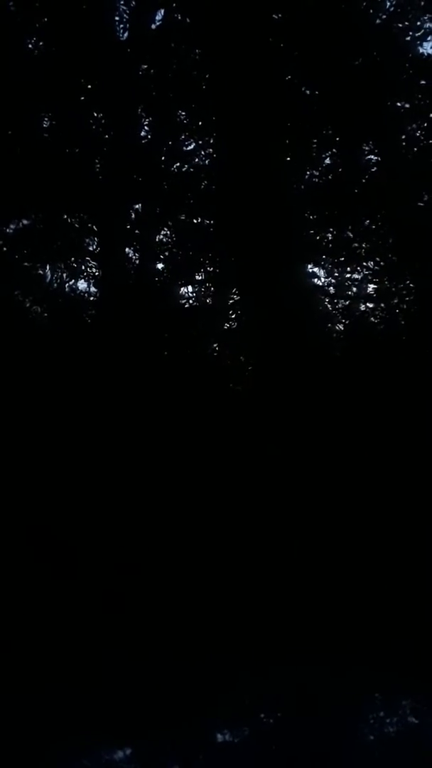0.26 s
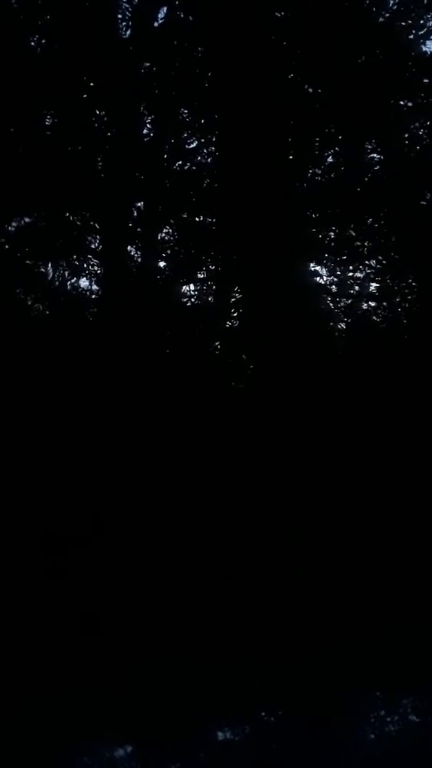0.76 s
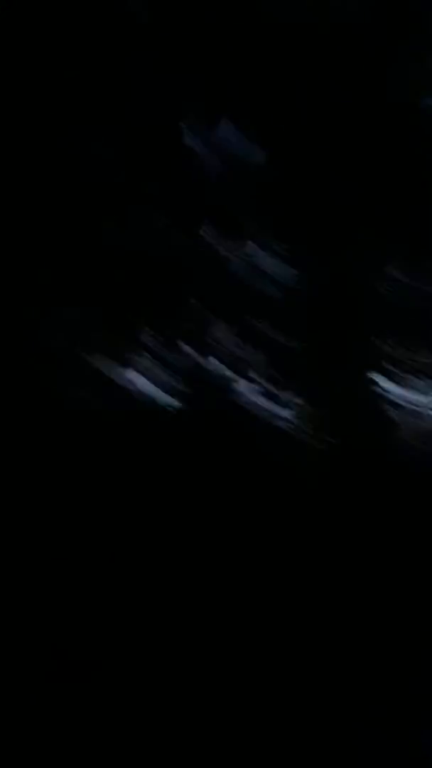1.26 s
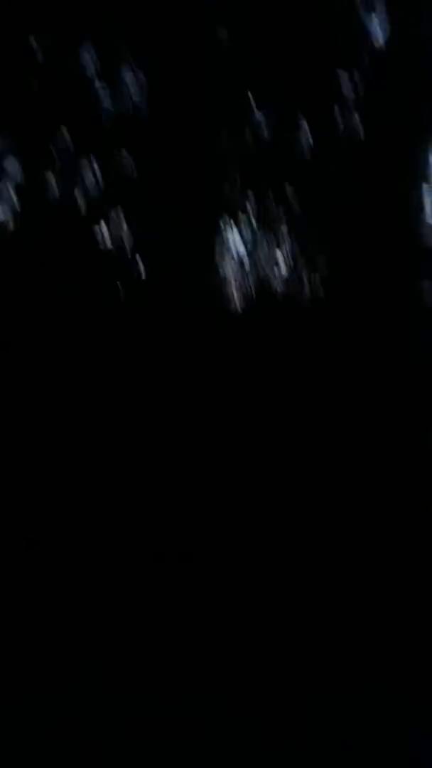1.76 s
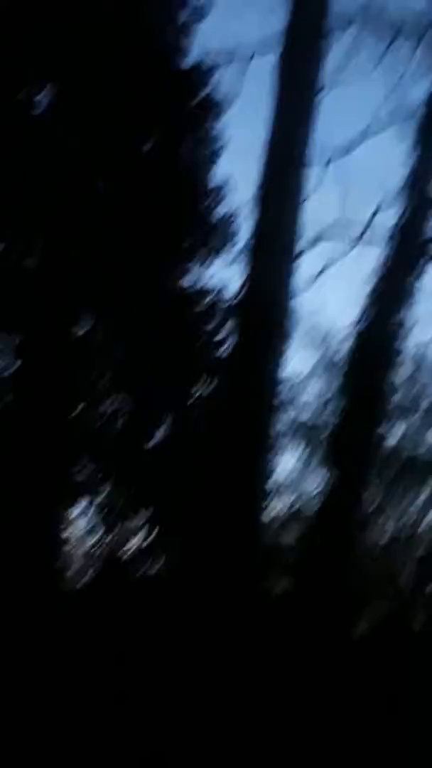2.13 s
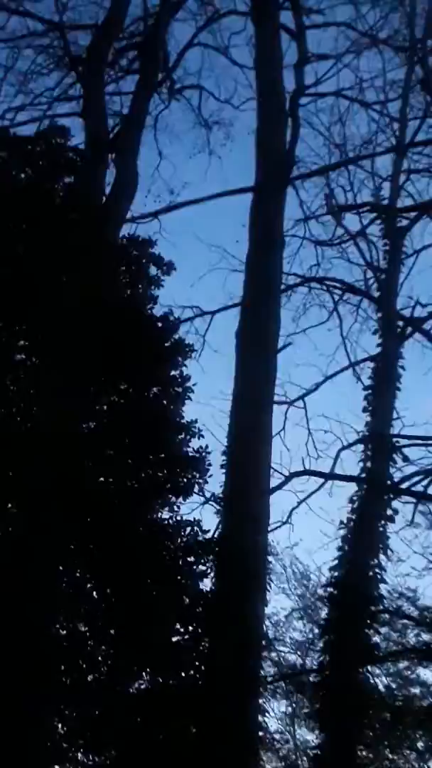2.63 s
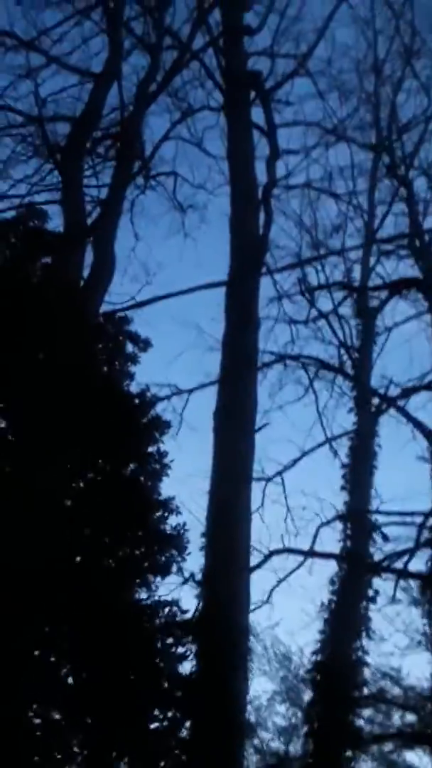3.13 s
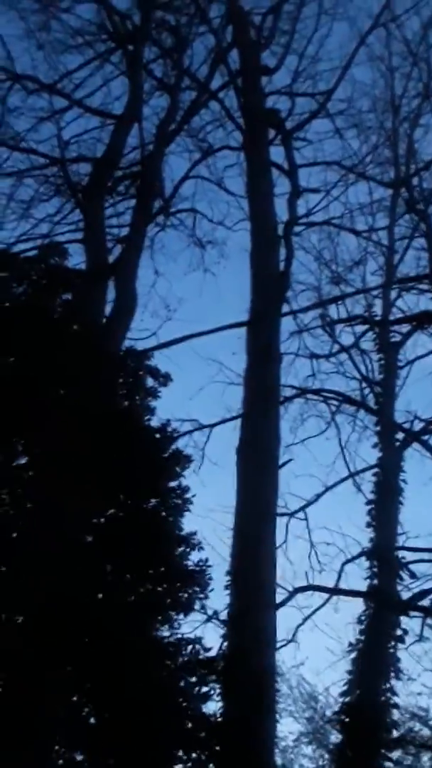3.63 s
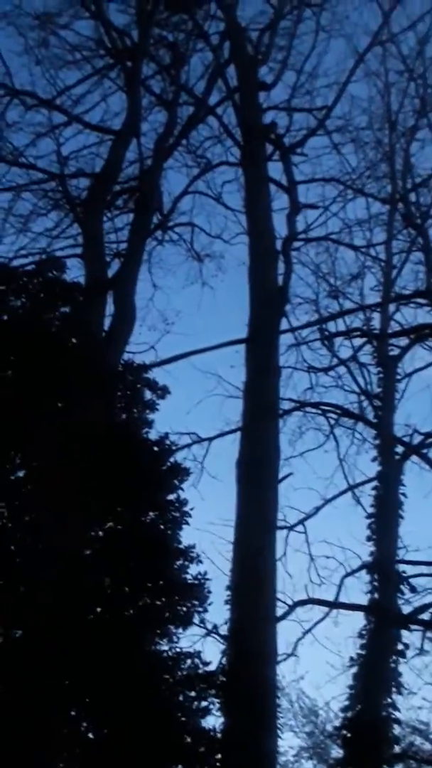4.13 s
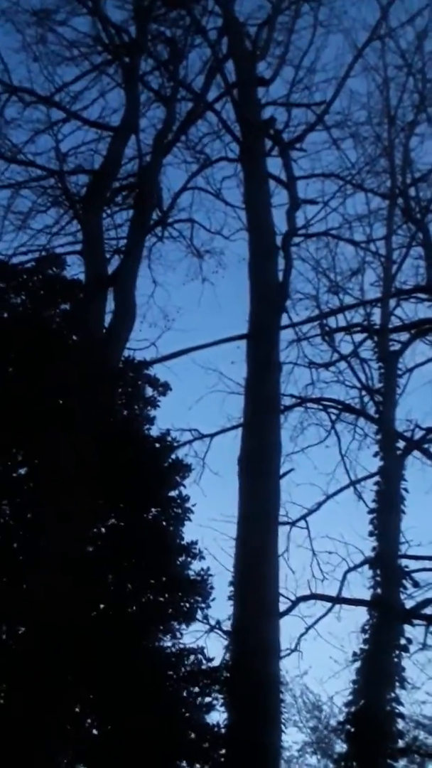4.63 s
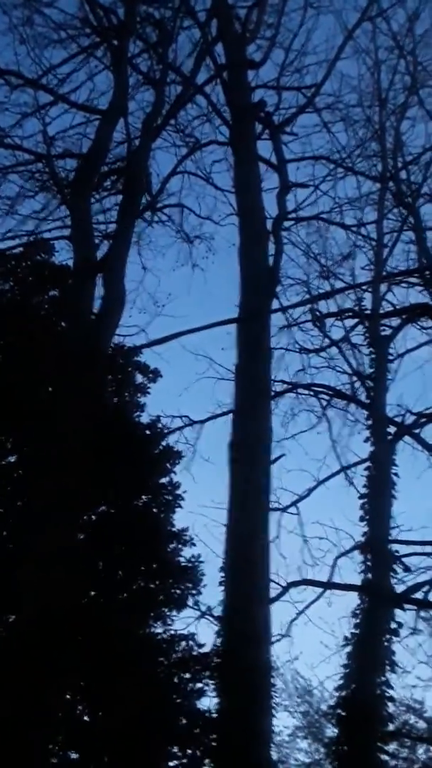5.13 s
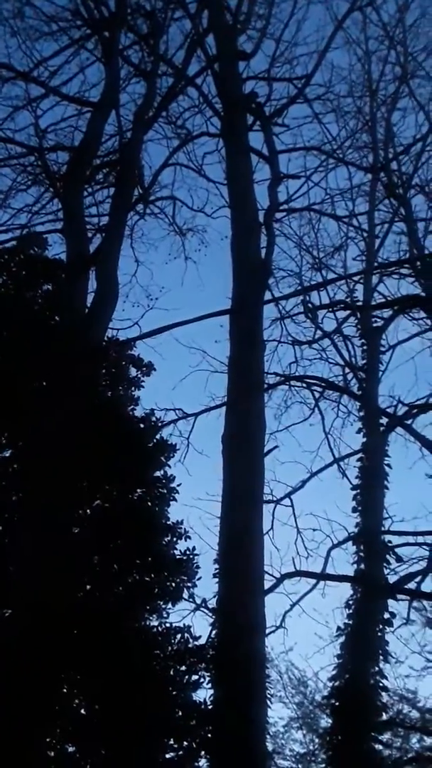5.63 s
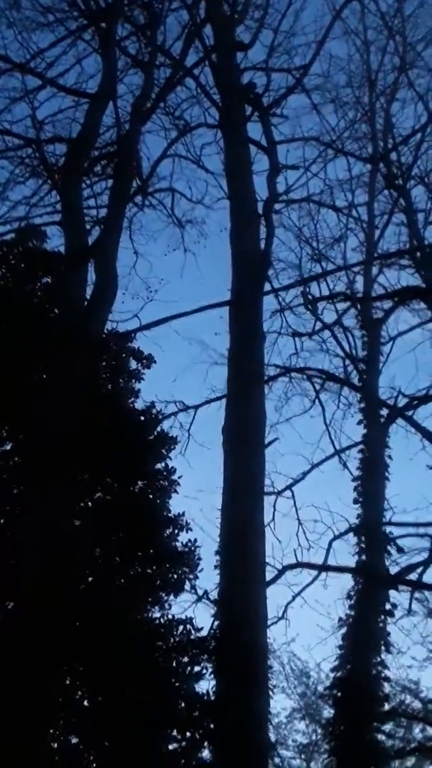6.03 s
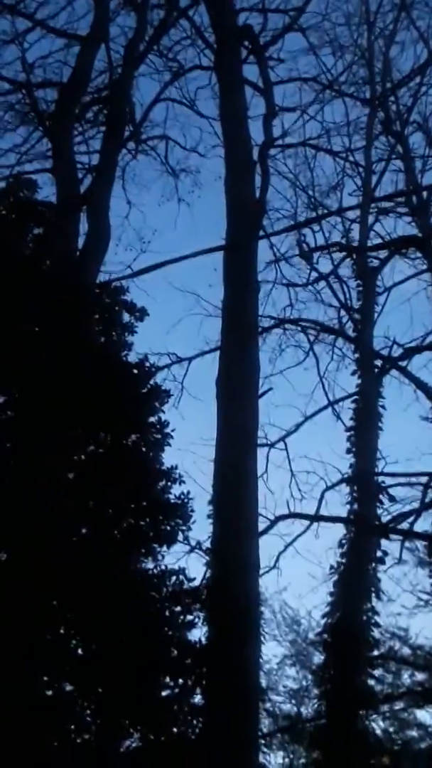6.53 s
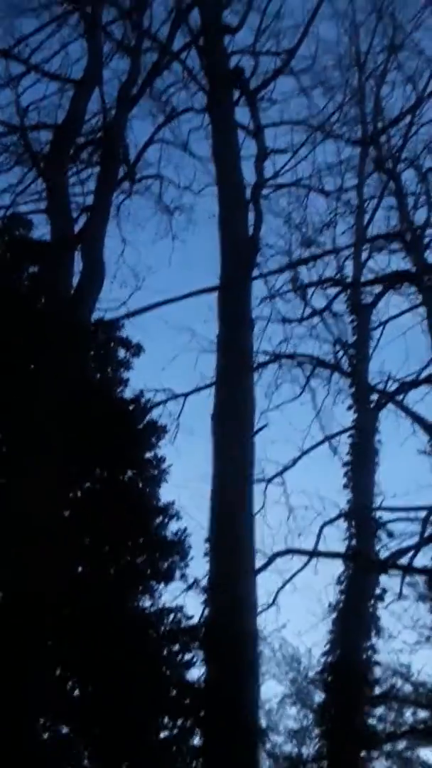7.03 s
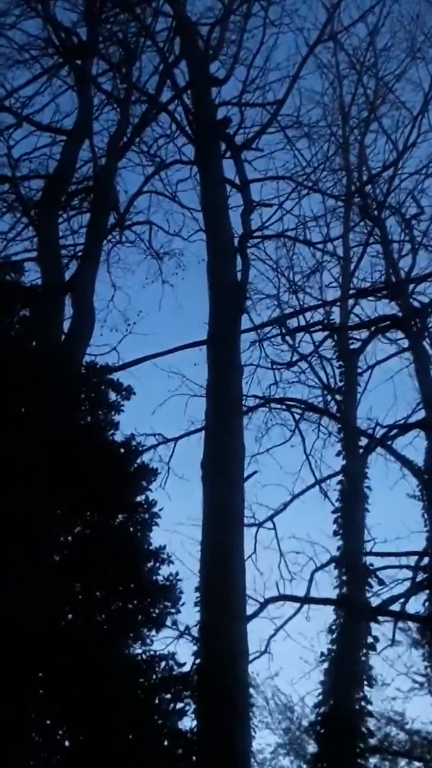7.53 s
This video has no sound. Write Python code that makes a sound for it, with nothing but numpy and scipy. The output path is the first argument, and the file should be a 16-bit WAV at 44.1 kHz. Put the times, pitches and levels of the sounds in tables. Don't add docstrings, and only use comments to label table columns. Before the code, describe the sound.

Two owls trade nasal rising hoots, softer flipping hoots, caws and screams in dusk woods, with leaf rustles and a shimmering frog chorus.

```python
import sys
import numpy as np
from scipy import signal
from scipy.fft import rfft, irfft, next_fast_len
from scipy.io import wavfile
from scipy.ndimage import uniform_filter1d, map_coordinates

SR = 44100
rng = np.random.default_rng(int(sys.argv[2]) if len(sys.argv) > 2 else 0)


def voltage_ratio(level):
    return 10 ** (np.asarray(level, float) / 20)


def master_out(mix):
    frames = np.transpose(np.atleast_2d(mix))
    ceiling = np.clip(frames, -1, 1)
    pcm = np.round(ceiling * 32767).astype(np.int16)
    wavfile.write(sys.argv[1], SR, pcm)


N = 342657
TIME = np.arange(N) / SR


def unit(x):
    return x / np.sqrt(np.mean(x ** 2) + 1e-20)


def along(points, hz):
    f, v = np.transpose(points)
    return np.interp(np.log(hz + 1), np.log(f + 1), v)


def curves(rows, t=TIME):
    s, *cols = np.transpose(rows)
    return [np.interp(t, s, c) for c in cols]


def wobble(rate):
    knots = rng.standard_normal(int(N * rate / SR) + 4)
    return map_coordinates(knots, [np.arange(N) * rate / SR])


def filtered(x, response):
    m = next_fast_len(N + 8192)
    return irfft(rfft(x, m) * response(np.fft.rfftfreq(m, 1 / SR)), m)[..., :N]


def band(x, lo_hz, hi_hz):
    return unit(filtered(x, lambda hz: 1 / (1 + (lo_hz / (hz + 1)) ** 6) / (1 + (hz / hi_hz) ** 6)))


def ports(x, lag, left_db):
    at = np.arange(N)
    left = voltage_ratio(left_db / 2) * map_coordinates(x, [at - lag / 2])
    right = voltage_ratio(-left_db / 2) * map_coordinates(x, [at + lag / 2])
    return np.array([left, right])


def span(rows, fade_s):
    a, b = round(rows[0][0] * SR), min(round(rows[-1][0] * SR), N)
    t = TIME[a:b]
    return slice(a, b), t, np.clip(np.minimum(t - t[0], t[-1] - t) / fade_s, 0, 1)


def air():
    # (frequency [Hz], level [dB per Hz])
    traffic = [(15, -67.5), (25, -20), (113, -6.5), (182, -10.5), (216, -10.5), (323, -15), (430, -11.5),
               (668, -17), (941, -15), (2400, -39), (3120, -37), (5280, -120)]
    # (frequency [Hz], level [dB per Hz])
    hiss = [(2800, -24.5), (3500, -17.5), (3900, 2.5), (4300, 7), (4700, -6.5), (5200, -28), (6500, -18),
            (7600, -4.5), (8900, -15.5), (10500, 2), (12000, -1), (14000, -8), (14800, -14), (16000, -48)]
    # (time [s], traffic level [dB], hiss level [dB])
    levels = [(0.0, -50.5, -61), (3.53, -51.5, -61.5), (7.77, -50.5, -62)]
    # (frequency [Hz], correlation [share])
    likeness = [(60, 1), (600, 0.91), (1400, 0.24), (3000, 0.071), (15000, 0.12)]

    def pair(colour):
        def response(hz):
            angle = np.arccos(np.clip(along(likeness, hz), -1, 1)) / 2
            return voltage_ratio(along(colour, hz)) * [np.cos(angle), np.sin(angle)]
        shared_and_side = filtered(rng.standard_normal((2, N)), response)
        return unit(np.array([[1, 0.84], [1, -0.73]]) @ shared_and_side)

    low_db, hiss_db = curves(levels)
    hum = voltage_ratio(low_db + 7.0 + 0.7 * wobble(3.8)) * pair(traffic)
    return hum + voltage_ratio(hiss_db + 1.5) * voltage_ratio([[-1.5], [1.5]]) * pair([(1500, -120)] + hiss)


def frogs():
    # (time [s], level [dB])
    chorus = [(0.0, -63.5), (1.73, -55.5), (2.18, -58.5), (2.4, -50), (3.68, -45), (7.36, -45), (7.77, -49)]
    # (frequency [Hz], level [dB per Hz])
    far_colour = [(1180, -63.5), (2000, -32), (2260, -11), (2530, 21.5), (2690, 30), (2940, -43.5),
                  (3190, -34.5), (3500, -65), (4550, -85.5), (7700, -120)]
    draw = rng.random((2400, 3))
    t = np.arange(SR // 12) / SR
    hz = 2560 + 260 * draw[:, 1:2]
    peep = voltage_ratio(3.1 * draw[:, 2:]) * np.sin(2 * np.pi * hz * (t + 0.5 * t * t)) * np.hanning(len(t))
    at = (draw[:, :1] * N).astype(int) + np.arange(len(t))
    peeps = unit(np.bincount(at.ravel(), peep.ravel(), N + len(t))[:N])
    far = unit(filtered(rng.standard_normal((3, N)), lambda f: voltage_ratio(along(far_colour, f))))
    level = voltage_ratio(curves(chorus)[0] + 1.5 + 1.3 * wobble(9))
    centre = ports(level * unit(0.62 * peeps + 0.7 * far[0]), 20, left_db=-3.0)
    return centre + voltage_ratio(-7.0) * level * far[1:]


def faint_rush():
    # (time [s], level [dB])
    rush_loudness = [(0, -58), (.25, -62.5), (1.0, -68), (1.8, -76.5), (3, -87.5), (7.77, -74.5)]
    # (frequency [Hz], level [dB per Hz])
    colour = [(1500, -27), (2100, 10), (3300, -6), (5000, -6.5), (6500, -8.5), (8500, -20.5),
              (10000, -63.5)]
    rush = unit(filtered(rng.standard_normal((2, N)), lambda hz: voltage_ratio(along(colour, hz))))
    return voltage_ratio(curves(rush_loudness)[0] + 1.2 * wobble(3.9)) * rush


def ticks():
    # (time [s], rate [Hz], level [dB])
    pulses = [(0, 99.5, -67), (1.9, 102.2, -64), (2.4, 102.2, -58), (4.92, 100.9, -61), (4.95, 101.3, -107),
              (5.5, 86.3, -84), (5.7, 86.9, -65), (7.77, 88.1, -69)]
    # (frequency [Hz], level [dB])
    colour = [(8000, -29.5), (10000, -12), (11500, -0.5), (13500, -8.5), (15000, -23)]
    # (time [s], frequency [Hz], level [dB])
    whine = [(2.3, 13250, -95.5), (2.45, 12820, -72), (2.9, 11320, -71.5), (3.6, 10810, -69.5),
             (4.9, 10300, -72), (4.95, 10320, -110)]
    rate_hz, db = curves(pulses)
    cycle = np.cumsum(rate_hz) / SR
    burst = np.exp(-(cycle % 1) / 0.14) * (1 - 0.4 * (cycle // 1 % 2))
    noise = rng.standard_normal((3, N))
    noise = noise[0] + 3.4 * noise[1:]
    wide = voltage_ratio(db) * unit(filtered(burst * noise, lambda hz: voltage_ratio(along(colour, hz))))
    whine_hz, whine_db = curves(whine)
    narrow = np.array([wobble(1100), wobble(1100)]) * np.sin(2 * np.pi * np.cumsum(whine_hz) / SR)
    return voltage_ratio([[-1.1], [1.1]]) * (wide + voltage_ratio(whine_db + 4) * unit((0.3 + burst) * narrow))


def voiced(s, hz, db, first, second, drift_db=0):
    drift = drift_db * (s - s[0]) / (s[-1] - s[0])
    return np.transpose([s, hz, db + along(first, hz), db + along(second, hz) + drift])


def arch(row, shape):
    start, rise_s, fall_s, top_hz, db = row
    from_hz, to_hz, up, down = shape
    bend = np.linspace(0, 1, num=12)
    rise = np.sin(np.pi / 2 * bend) ** up
    fall = np.cos(np.pi / 2 * bend[1:]) ** down
    s = start + np.r_[rise_s * bend, rise_s + fall_s * bend[1:]]
    return s, np.r_[from_hz + (top_hz - from_hz) * rise, to_hz + (top_hz - to_hz) * fall], db


def quavering(rows, start=0, rate_hz=0, depth=0):
    s = np.linspace(rows[0][0], rows[-1][0], num=120)
    hz, db = curves(rows, s)
    return s, hz * (1 + depth * np.sin(2 * np.pi * rate_hz * np.maximum(s - start, 0))), db


def owl(hoots, beaks, jitter, flutter_db, rough):
    # (frequency [Hz], level [dB])
    throat = [(400, 7), (650, -3.5), (820, -15.5), (1000, -28), (1300, -38.5), (1640, -38), (1830, -49),
              (2100, -42), (2400, -39), (2700, -53), (4000, -88.5)]
    # (frequency [Hz], level [dB])
    open_beak = [(500, -13), (900, -3.5), (1100, 3.5), (1330, 3), (1520, -10.5), (1750, -29.5),
                 (2200, -33.5), (2600, -69.5)]
    # (frequency [Hz], level [dB])
    shrill_colour = [(1800, -51.5), (2400, -23), (2850, -8), (3200, -27.5), (3550, -53.5), (4000, -36.5),
                     (4400, -26), (4750, -33.5), (5100, -46.5), (5700, -39), (6300, -45), (8300, -48.5),
                     (10000, -86)]
    gape_hz = 5430

    def upper(f):
        return voltage_ratio(along(shrill_colour, f))

    def pinch(f):
        return np.exp(-((f - 5230) / 300) ** 2)

    out, breath = np.zeros(N), np.zeros((3, N))
    shake, flutter, rasp = wobble(70), wobble(45), wobble(420)
    air_noise = rng.standard_normal(N)
    ragged = voltage_ratio(2.5 * np.roll(flutter, SR))
    for rows, (open_db, shrill_db, tense_db) in zip(hoots, beaks):
        at, t, gate = span(rows, fade_s=0.0046)
        hz, first, second = [uniform_filter1d(c, size=350, mode="nearest") for c in curves(rows, t)]
        turn = 2 * np.pi * np.cumsum(hz * (1 + jitter * shake[at])) / SR
        raspy = 1 + rough * rasp[at]
        climb = np.minimum((t - t[0]) / 0.19, 1) - 0.5
        low = voltage_ratio(first) * np.sin(turn) + voltage_ratio(second) * np.sin(2 * turn) * (1 + 0.12 * rasp[at])
        effort = gate * voltage_ratio(np.maximum(first, second))

        tight_db = tense_db * np.clip((hz - 440) / 90, 0, 1)
        closed = sum(voltage_ratio(along(throat, k * hz) + tight_db * (k * hz > 1300) - 3.3 * (k - 3.5))
                     * np.sin(k * turn) for k in range(3, 8))

        lift_db = 0.27 * max(open_db, -6) + 2 * climb
        wide = sum(voltage_ratio(open_db + along(open_beak, k * hz * voltage_ratio(-lift_db)))
                   * np.sin(k * turn + k * k) for k in range(3, 9))
        push = gate * effort ** 0.47 * effort.max() ** 0.68
        voice = gate * low + effort * closed + push * wide * ragged[at] * raspy
        out[at] += np.sqrt(2) * voltage_ratio(flutter_db * flutter[at]) * voice

        gape_db = 2.5 + 2 * open_db + shrill_db
        pinch_db = -27 if open_db < -5 else -120
        shrill = gate * ragged[at] * (effort / effort.max()) ** 0.27 * effort.max()
        shrill = shrill * np.minimum((t - t[0]) / 0.02, 1) * voltage_ratio(shrill_db)
        seen = hz * voltage_ratio(-0.82 * climb)
        ring = sum((upper(k * seen) * voltage_ratio(gape_db * (k * seen > gape_hz)) + voltage_ratio(pinch_db) * pinch(k * seen))
                   * np.sin(k * turn + k * k) for k in range(4, 24))
        out[at] += shrill * voltage_ratio(-1.5) * raspy * ring
        puffs = 0.45 * air_noise[at] * (1 + np.sin(turn))
        breath[:, at] += shrill * voltage_ratio(np.array([[0], [gape_db], [pinch_db]])) * puffs
    hissed = filtered(breath, lambda f: [upper(f) * (f < gape_hz), upper(f) * (f >= gape_hz), pinch(f)])
    return out + hissed.sum(axis=0)


def nasal_owl():
    # (start [s], rise [s], fall [s], top pitch [Hz], effort [dB])
    short_hoots = [
        (0.27, 0.059, 0.051, 293.5, -35.5),
        (0.7, 0.092, 0.042, 343, -25),
        (1.12, 0.1, 0.035, 461, -20.5),
        (1.53, 0.1, 0.048, 462.5, -17),
        (1.94, .1, 0.061, 480.4, -16),
        (2.341, 0.095, 0.072, 512, -15),
        (7.421, 0.095, 0.087, 568, -16.5),
    ]
    # (start [s], rise [s], fall [s], top pitch [Hz], beak opening [dB])
    caws = [(4.708, 0.067, 0.086, 583.4, 1), (5.09, 0.094, .058, 602.6, 1), (5.487, 0.102, 0.079, 551, -2)]
    screams = [(3.91, 0.082, 0.079, 482.8, -1.5), (4.3, 0.078, 0.074, 504, 0.49)]
    shrieks = [(6.592, .105, .077, 665.5, -6), (6.955, .082, .09, 547.8, -6)]
    # (time [s], pitch [Hz], effort [dB])
    drawls = [
        [(2.55, 241.6, -17), (2.6, 503, -16), (2.64, 548.2, -15.5), (2.73, 542.7, -16), (2.76, 502, -19),
         (2.82, 313.7, -15.5), (2.86, 264.8, -17), (2.92, 213.5, -16), (3.1, 190, -18.5)],
        [(5.7, 271.7, -28.5), (5.74, 446, -13.5), (5.78, 590, -22), (5.81, 592, -24), (5.85, 463.4, -14),
         (5.9, 398, -21.5), (5.95, 339, -22.5), (5.98, 295, -17), (6.1, 256, -17.5)],
    ]
    # (start [s], rate [Hz], depth [share of pitch])
    quavers = [(2.973, 21.3, 0.056), (5.983, 20.2, 0.066)]
    # (opening [dB], shrillness [dB], throat tension [dB])
    drawl_beaks = [(-30.5, -44, 11), (-32, -42.5, -19)]
    drawl_second_db = [-1.5, 0.8]
    # (pitch [Hz], level [dB])
    closed_first = [(180, -40.5), (235, -34), (325, -15), (370, -12.5), (460, -2), (550, 1), (620, 9)]
    closed_second = [(170, -19), (235, -13), (325, -5), (370, -18), (460, -20), (550, -24)]
    open_first = [(260, -21), (340, -12.5), (400, -9.5), (460, -3), (510, -1.5), (590, -5), (660, 0)]
    open_second = [(260, -10.5), (340, -12.5), (400, -6.5), (470, -1), (550, 5), (660, 6.5)]
    shriek_first = [(260, -24.5), (340, -16.5), (400, -13.5), (460, -9), (510, -4), (590, 1.5), (660, 0)]
    half_second = [(255, -20), (340, -9.5), (420, -5.5), (460, -8.5), (490, -23)]
    # (start [s], rise [s], fall [s], top pitch [Hz], effort [dB])
    half_caw = (3.552, .064, .062, 490, -18)

    hoots, beaks = [], []
    for row in short_hoots:
        rows = voiced(*arch(row, (228, 260, 1.8, 2)), closed_first, closed_second, 0.48)
        spare_db = min(row[-1] + 14.5, 0)
        rows[:, -1] += 4.4 * spare_db * np.log2(np.maximum(rows[:, 1] / 285, 1))
        hoots.append(rows)
        beaks.append(np.array([-20.5, -45, 4.5]) + 0.93 * spare_db)

    # (table, 1st harmonic, arch, drift dB, effort dB, shrillness and tension dB)
    open_calls = [(caws, open_first, (318, 283, 1, 1.43), -6.5, -23.5, (-10, 2.3)),
                  (screams, open_first, (289, 263.5, 2, 1.27), -6.5, -19, (0.21, 4.4)),
                  (shrieks, shriek_first, (223, 242, 2.3, 2), -11.5, -20, (-0.65, 4.3))]
    for table, first, shape, drift_db, db, beak in open_calls:
        for *row, open_db in table:
            effort_db = db - 0.048 * open_db
            rows = voiced(*arch((*row, effort_db), shape), first, open_second, drift_db)
            rows[:, -1] += 0.2 * open_db
            hoots.append(rows)
            beaks.append((open_db, *beak))

    hoots.append(voiced(*arch(half_caw, (285, 222, 1.47, 1.36)), closed_first, half_second, 1.2))
    beaks.append((-5.5, -12, 0))
    for rows, quaver, db in zip(drawls, quavers, drawl_second_db):
        hoots.append(voiced(*quavering(rows, *quaver), closed_first, closed_second) + [0, 0, 0, db])
    return owl(hoots, beaks + drawl_beaks, jitter=0.0017, flutter_db=1.1, rough=0.3)


def trunks(x):
    # (frequency [Hz], t60 [s])
    dying = [(200, 0.31), (600, 0.33), (1500, 0.26), (4000, 0.3), (10000, 0.048)]
    # (frequency [Hz], amount [share])
    scatter = [(300, 0.26), (700, 0.093), (1200, 2.1), (4000, 2)]
    hz, t, z = signal.stft(rng.standard_normal((3, SR)), SR, nperseg=256)
    apart = along(scatter, hz)
    z = z * np.array([1 + 0 * hz, apart, apart])[..., None] / np.hypot(1, apart)[:, None]
    tail = signal.istft(z * voltage_ratio(-60 * t / along(dying, hz)[:, None]), SR, nperseg=256)[1]
    tail = tail[0] + tail[1:]
    late = np.pad(x, (700, 0))
    return signal.fftconvolve(late[None], tail / np.linalg.norm(tail[0]), axes=1)[:, :N]


def whistled(rows, rough, hoarse):
    out = np.zeros(N)
    at, t, gate = span(rows, fade_s=0.014)
    hz, db = curves(rows, t)
    turn = 2 * np.pi * np.cumsum(hz * (1 + rough * hoarse[at])) / SR
    out[at] = gate * voltage_ratio(db + 11.0) * np.sin(turn)
    return out


def bird():
    # (time [s], pitch [Hz], level [dB])
    calls = [
        [(0.34, 3060, -67), (0.432, 3800, -72), (0.56, 3980, -77)],
        [(2.17, 2865, -91), (2.184, 3097, -56), (2.32, 2815, -65.5)],
    ]
    hoarse = wobble(170)
    return whistled(calls[0], 0.022, hoarse) + whistled(calls[1], 0.015, hoarse)


def snaps():
    # (time [s], peak level [dB], centre [Hz])
    clicks = [(1.0012, -42, 5000), (1.0562, -34.5, 6480), (1.079, -37.5, 6530), (1.105, -41.5, 5000),
              (1.177, -42.5, 3600), (1.1862, -27.5, 3400), (1.2162, -28, 4500), (1.4245, -42, 5960),
              (1.527, -47, 4000), (1.8873, -42, 6550), (2.083, -39, 6030), (2.0997, -41.5, 7030),
              (2.184, -43.5, 7000), (2.262, -49, 4800), (3.1134, -48, 6440), (3.1368, -41.5, 6600),
              (3.2053, -45.5, 6600), (3.5204, -45, 6930), (3.6235, -44, 7350), (5.24, -47.5, 7030),
              (5.28, -47, 7000), (5.3397, -43.5, 6800)]
    out, t = np.zeros(N), np.arange(400) / SR
    for s, db, hz in clicks:
        burst = voltage_ratio(db + 0.5 - 60 * t / 0.006) * rng.standard_normal(len(t))
        sos = signal.butter(2, [hz / 1.6, hz * 1.6], "band", fs=SR, output="sos")
        out[round(s * SR):][:len(t)] += signal.sosfilt(sos, burst)
    return ports(out, 8, left_db=-11)


def rustle():
    # (peak [s], rise [s], dying time [s], level [dB], crispness [dB])
    movements = [(1.089, 0.012, 0.56, -59.5, -14), (1.252, 0.016, 0.036, -46.5, -2.5),
                 (1.225, 0.0097, 0.067, -52.5, -8.5), (1.28, 0.023, 0.03, -55.5, -11.5),
                 (1.425, 0.0078, 0.31, -63, -15.5), (1.897, 0.0075, 0.034, -52.5, 0),
                 (2.105, 0.011, 0.11, -63.5, 0), (2.268, .006, .05, -66, -13),
                 (3.14, 0.025, 0.37, -55, -11), (3.53, 0.011, 0.5, -59.5, -15.5),
                 (3.629, 0.0068, 0.094, -66, -17), (5.262, 0.013, 0.25, -58.5, -19),
                 (5.34, 0.039, 0.34, -65.5, -18), (6.391, 0.03, 0.24, -53.5, -13),
                 (6.45, 0.012, 0.059, -67, -13.5)]
    clump = voltage_ratio(1.8 * wobble(60))
    crackle = (rng.random((3, N)) < 0.01) * rng.exponential(1, (3, N))
    grains = rng.standard_normal((3, N)) * (0.61 + 1.7 * crackle)
    grains = clump * (grains[0] + 5.4 * grains[1:])
    body, papery = band(grains, 2500, 7600), band(grains, 5200, 8200)
    top, low = band(grains, 9500, 15500), band(grains, 900, 2850)
    out = np.zeros((2, N))
    for s, rise_s, t60, db, crisp_db in movements:
        rise, fall = np.exp(-((TIME - s) / rise_s) ** 2), voltage_ratio(-60 * np.abs(TIME - s) / t60 / 2)
        swell = np.where(TIME < s, rise, fall)
        crisp = voltage_ratio(crisp_db - 5.0) * papery + voltage_ratio(crisp_db + 0.5) * top
        dull = voltage_ratio(-15 - 1.3 * crisp_db) * low
        out += swell * voltage_ratio(db + 4.5) * (body + crisp + dull)
    return out * voltage_ratio([[-1.5], [1.5]])


def cloth_swish():
    # (time [s], pitch [Hz], level [dB])
    slide = [(1.415, 6100, -69), (1.434, 5000, -60), (1.454, 4100, -63), (1.49, 3760, -68)]
    return whistled(slide, 0.16, wobble(1400))


def sole_squeak():
    # (time [s], pitch [Hz], level [dB])
    squeak = [(1.431, 1895, -72), (1.469, 1900, -59.5), (1.52, 1750, -59.5), (1.55, 1720, -81)]
    return whistled(squeak, 0.07, wobble(170))


def flip(start, climb_s, hold_s, top_hz, db):
    s = start + np.cumsum([0, climb_s, 0.0096, hold_s, 0.023, 0.023])
    pitches = [239.2, 441, top_hz, top_hz * (1 - 0.0081), top_hz * 0.69, 239.2]
    return [(a, hz, db) for a, hz in zip(s, pitches)]


def soft_owl():
    # (start [s], climb [s], hold [s], top pitch [Hz], effort [dB])
    flips = [(4.241, 0.058, 0.054, 599, -21.5), (4.583, 0.053, 0.057, 596, -20),
             (7.175, .056, .066, 661, -22), (7.594, 0.05, 0.049, 605, -24.5)]
    # (time [s], pitch [Hz], effort [dB])
    free_notes = [
        [(3.1, 298, -24), (3.125, 310, -25), (3.15, 396, -25.5), (3.175, 382, -25.5), (3.205, 286.6, -29.5),
         (3.24, 163.6, -25.5)],
        [(4.81, 267, -26), (4.85, 447, -16.5), (4.862, 612, -18.5), (4.91, 643, -18), (4.95, 653.4, -21.5),
         (5.03, 653, -28.5), (5.12, 626, -18.5), (5.17, 592, -18.5), (5.205, 562, -46)],
        [(5.205, 555.5, -35), (5.235, 504, -22.5), (5.275, 534.7, -30), (5.3, 451, -16)],
        [(5.295, 401, -14), (5.32, 397, -17.5), (5.49, 405.2, -20.5), (5.525, 372, -22.5), (5.55, 248, -25)],
        [(6.07, 243, -17.5), (6.115, 441, -23.5), (6.14, 629, -18), (6.2, 598, -30), (6.25, 629, -23.5),
         (6.37, 659, -31), (6.45, 653, -25.5), (6.48, 443, -27.5), (6.53, 194.2, -16.5)],
        [(6.56, 339, -29.5), (6.61, 507, -27.5), (6.64, 655, -24)],
    ]
    tries = [
        [(3.48, 249.4, -30.5), (3.53, 343.7, -18), (3.56, 510, -30), (3.585, 514.5, -30), (3.6, 404, -2.5)],
        [(3.88, 278.4, -31), (3.93, 368.7, -19), (3.955, 611, -29), (3.985, 581, -20.5), (4.03, 436, -34)],
    ]
    # (pitch [Hz], level [dB])
    soft_first = [(230, -25.5), (330, -10.5), (370, -6), (430, 1), (600, 2.5), (660, -1.5)]
    # (pitch [Hz], level [dB])
    soft_second = [(250, 11), (340, -1), (400, -18), (460, -20), (600, -32)]
    # (opening [dB], shrillness [dB], throat tension [dB])
    soft_beak = [(-29.5, -61.5, 4)]
    # (start [s], rate [Hz], depth [share of pitch])
    tremble = (5.33, 13, 0.029)
    notes = [quavering(flip(*row)) for row in flips]
    for rows in free_notes + tries:
        trembles = rows[0][0] < tremble[0] < rows[-1][0]
        notes.append(quavering(rows, *(tremble if trembles else ())))
    flat = [(1, 0.0025)]
    hoots = [voiced(s, hz, db + along(soft_first, hz), flat, soft_second) for s, hz, db in notes]
    return owl(hoots, soft_beak * len(hoots), jitter=0.003, flutter_db=1.2, rough=0.5)


def scene():
    # (time [s], nasal owl lag [samples], soft owl lag [samples])
    camera_turn = [(0, 1, 0.8), (1.8, 3.6, 0.92), (2.3, 12.2, 18), (2.6, 14.4, 16), (3.3, 16.84, 13),
                   (7.77, 15.8, 17.5)]
    # (frequency [Hz], level [dB])
    returned = [(300, -14), (700, -14), (950, -11), (3500, -11)]
    nasal, soft = nasal_owl(), soft_owl()
    nasal_lag, soft_lag = curves(camera_turn)
    whistles = bird() + sole_squeak() + cloth_swish()

    high = filtered(nasal, lambda hz: 1 - 1 / (1 + (hz / 850) ** 6))
    near = ports(nasal - high, nasal_lag, left_db=0.0) + ports(high, 0.8 * nasal_lag, left_db=-2.1)
    near = near + ports(soft, soft_lag, left_db=-0.5) + whistles

    bark = filtered(nasal + soft, lambda hz: voltage_ratio(along(returned, hz)) / (1 + (hz / 5000) ** 6))
    wood = trunks(voltage_ratio(-5.0) * whistles + bark)
    wood = np.array([ports(side, nasal_lag, left_db=-1.0)[k] for k, side in enumerate(wood)])
    return near + wood + faint_rush() + frogs() + rustle() + snaps() + air() + ticks()


def low_pass(x):
    return signal.sosfilt(signal.butter(12, 15740, fs=SR, output="sos"), x)


def record(dry):
    heard = filtered(dry, lambda hz: (hz < 15740) / (1 + (40 / (hz + 1)) ** 6))
    return low_pass(heard)


dry = scene()
out = record(dry)
master_out(out)
```